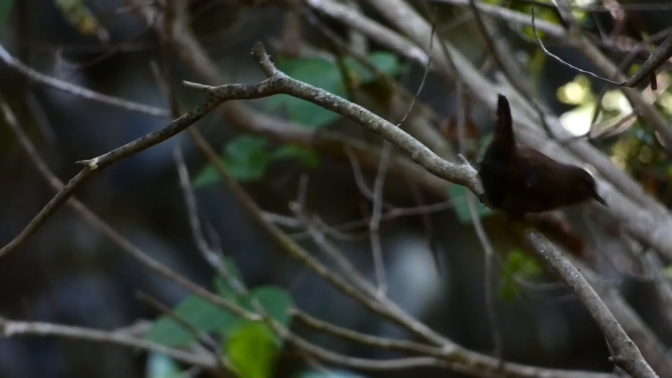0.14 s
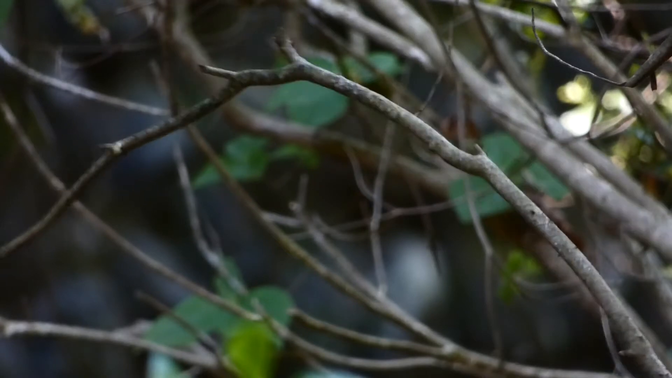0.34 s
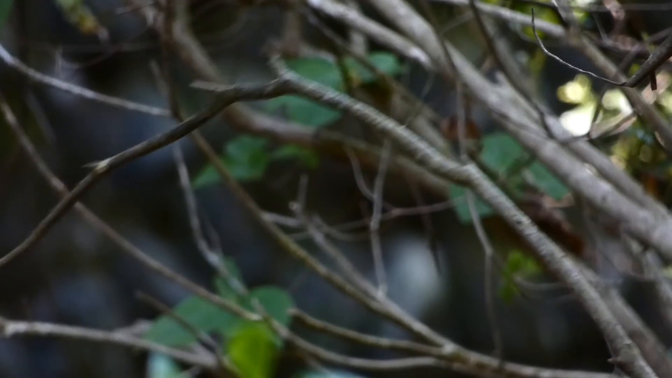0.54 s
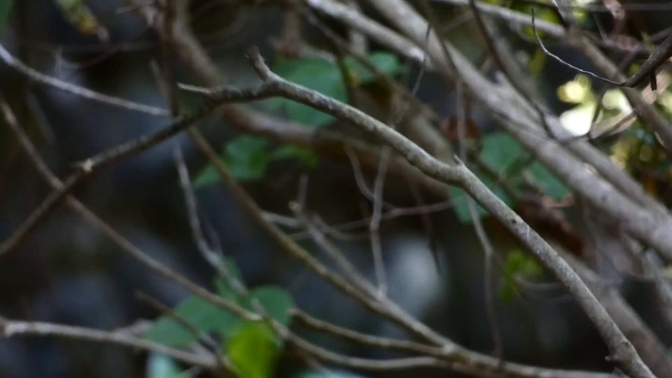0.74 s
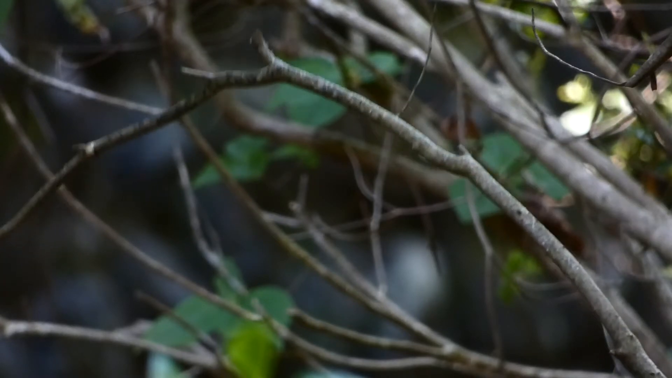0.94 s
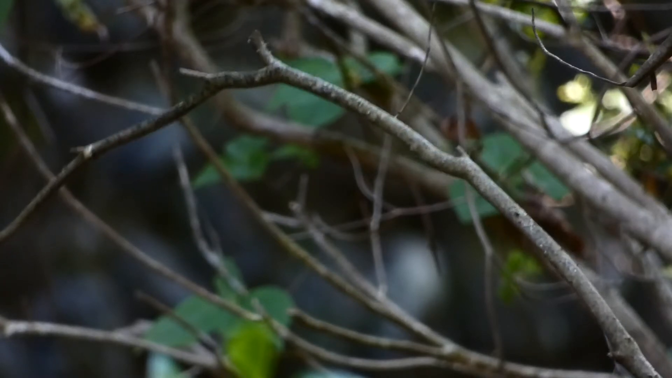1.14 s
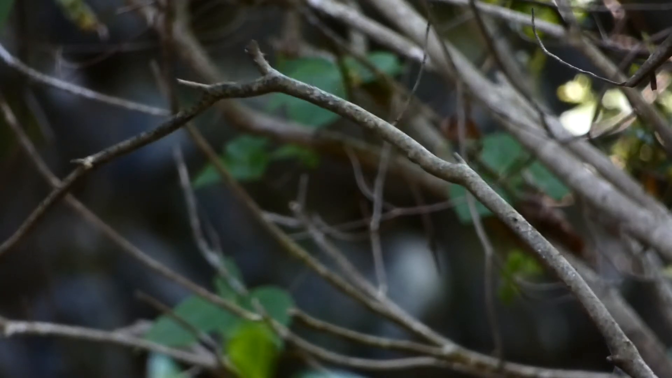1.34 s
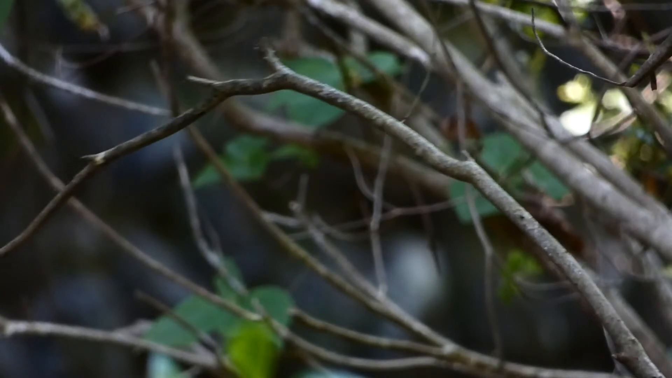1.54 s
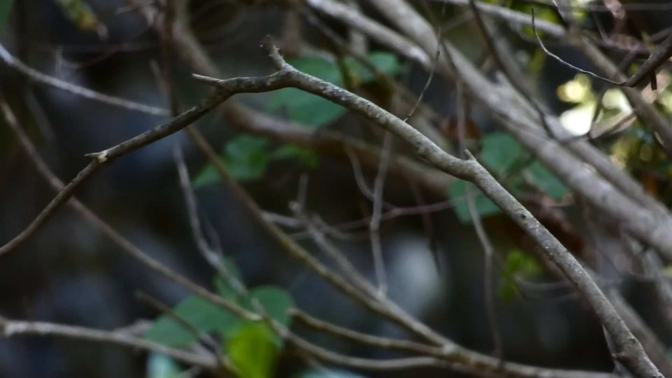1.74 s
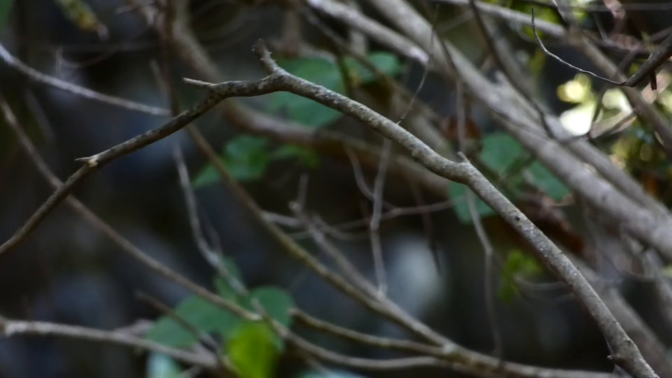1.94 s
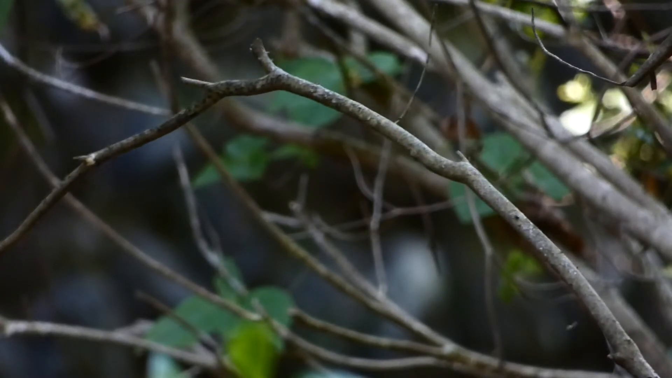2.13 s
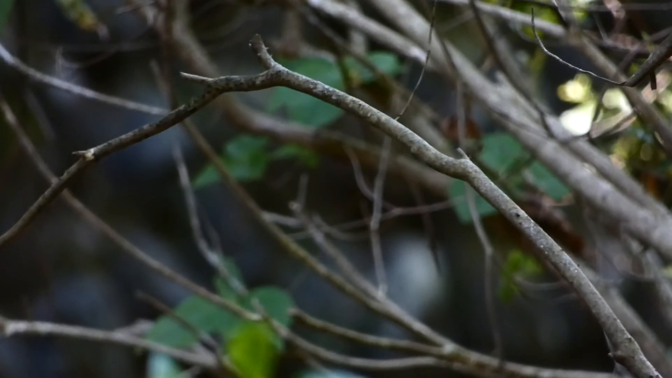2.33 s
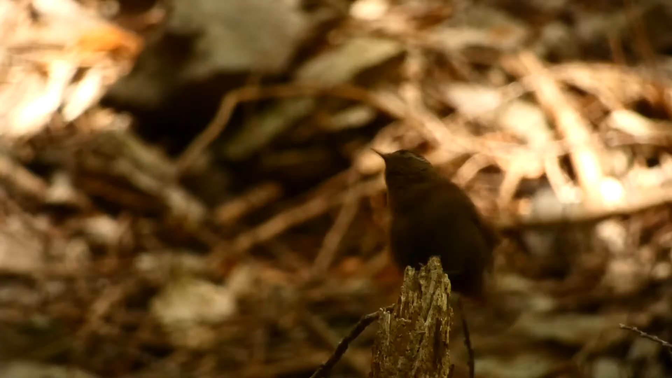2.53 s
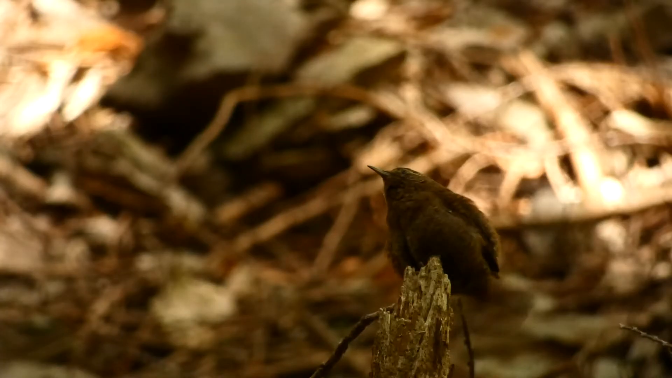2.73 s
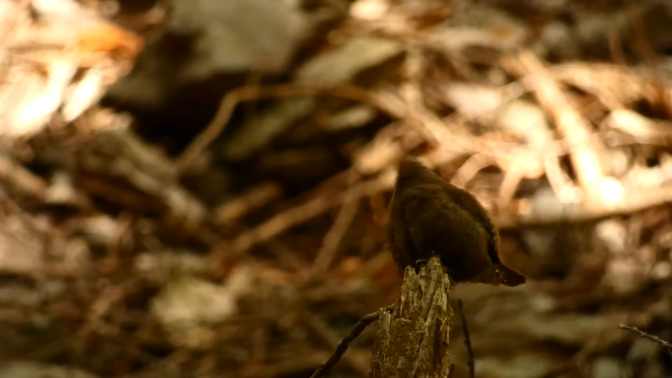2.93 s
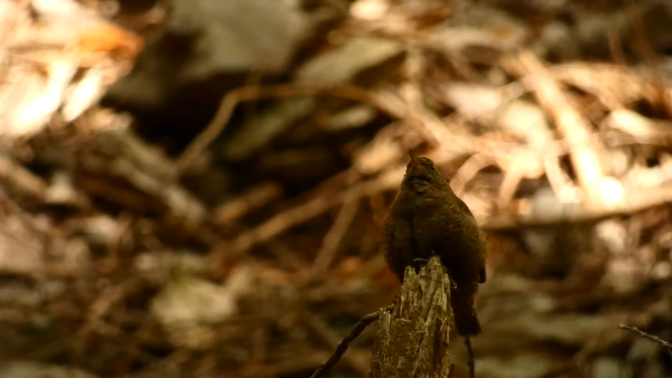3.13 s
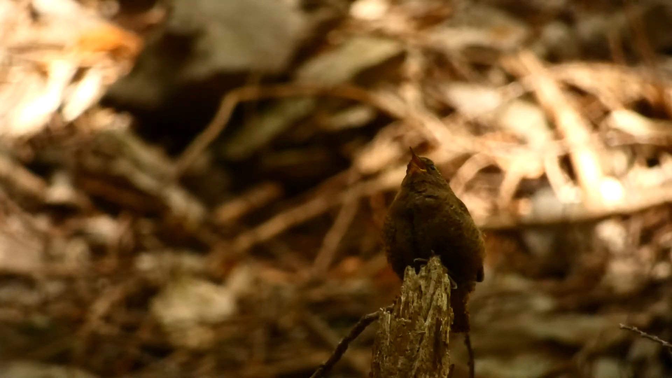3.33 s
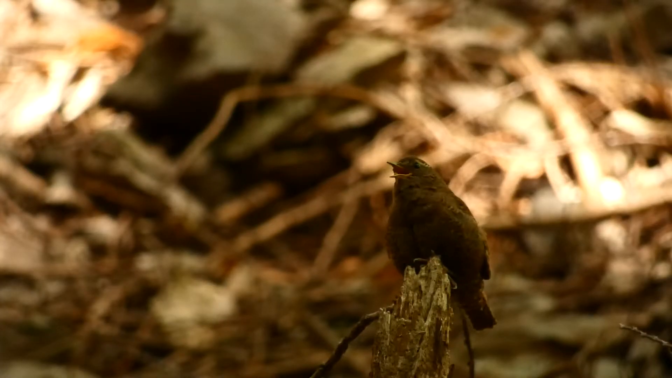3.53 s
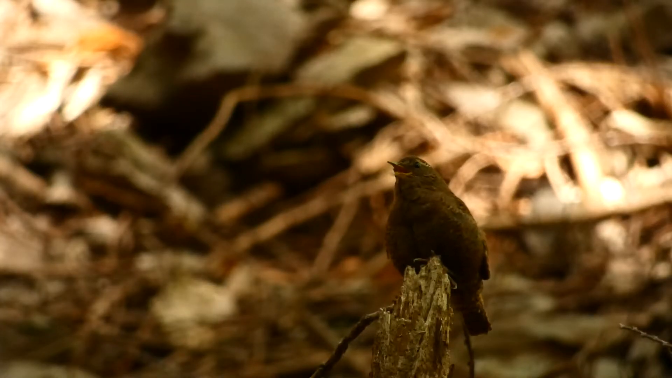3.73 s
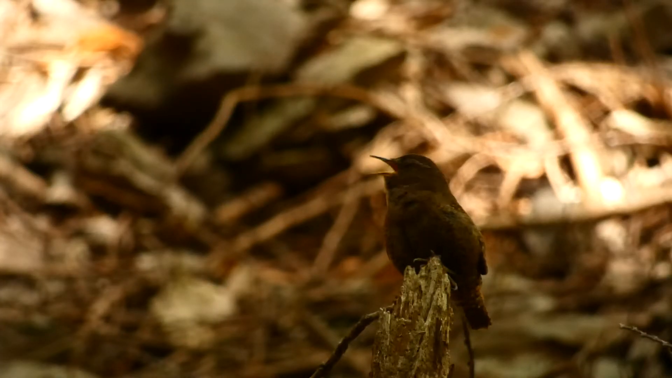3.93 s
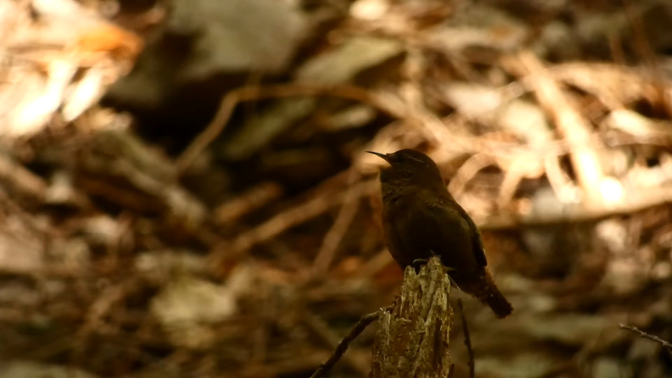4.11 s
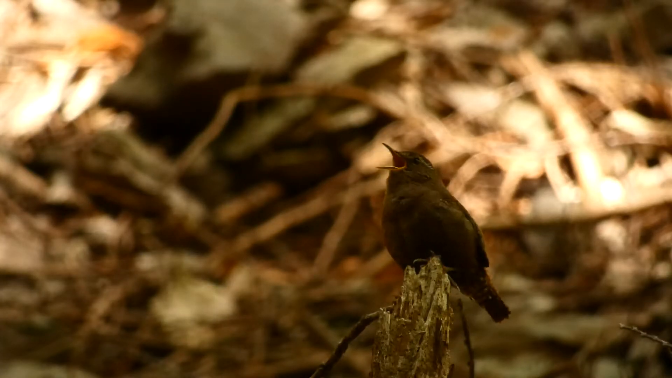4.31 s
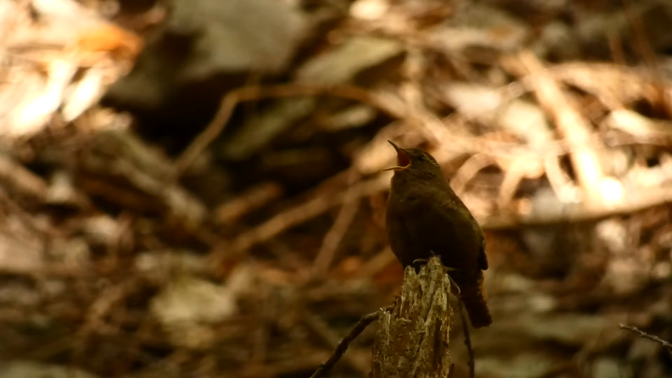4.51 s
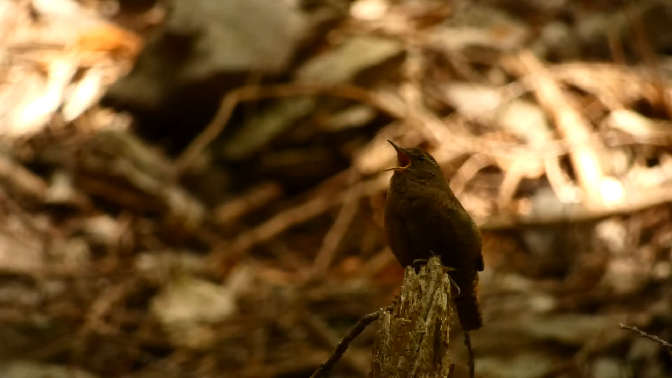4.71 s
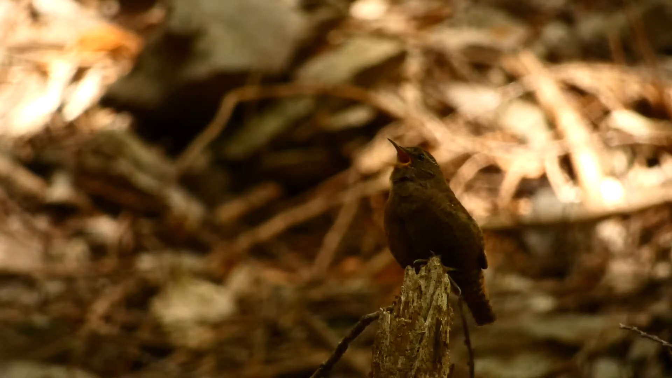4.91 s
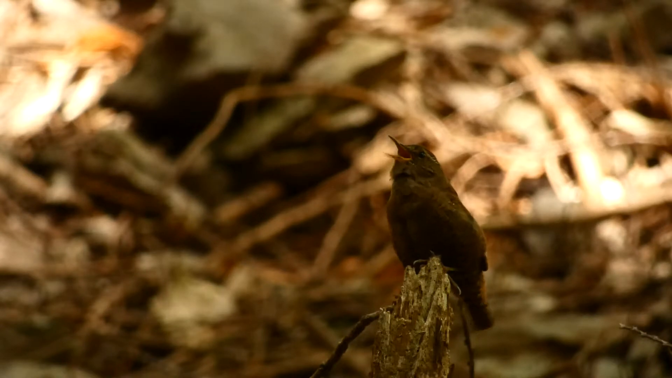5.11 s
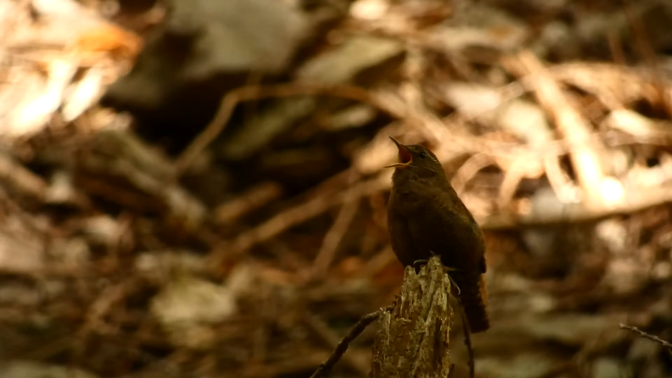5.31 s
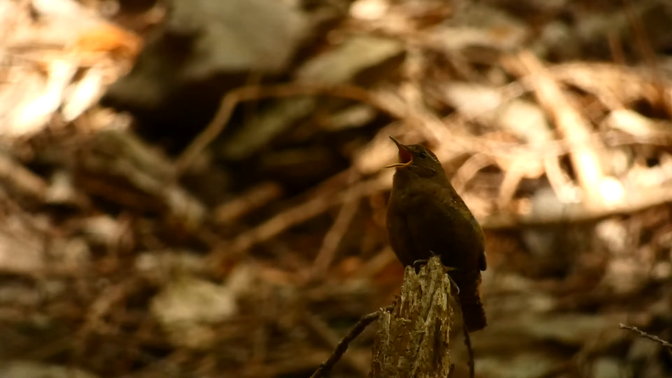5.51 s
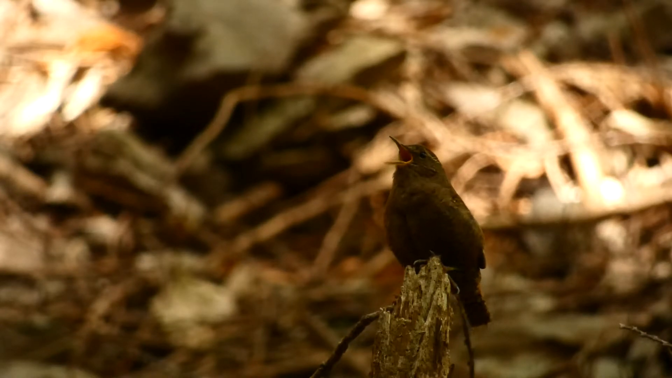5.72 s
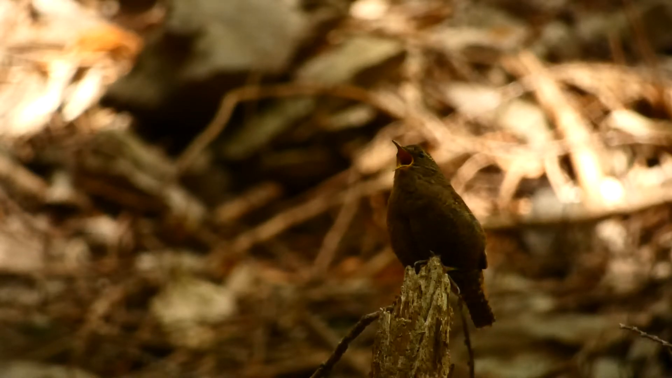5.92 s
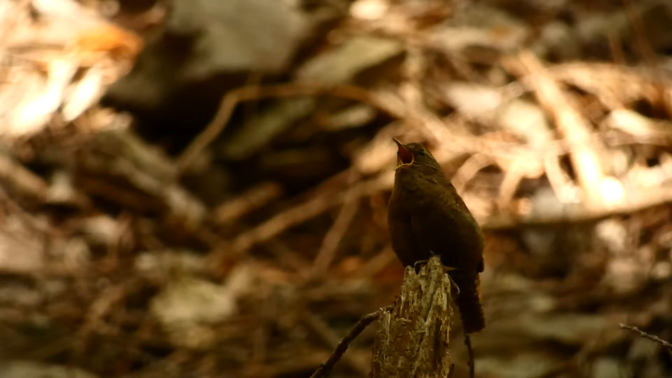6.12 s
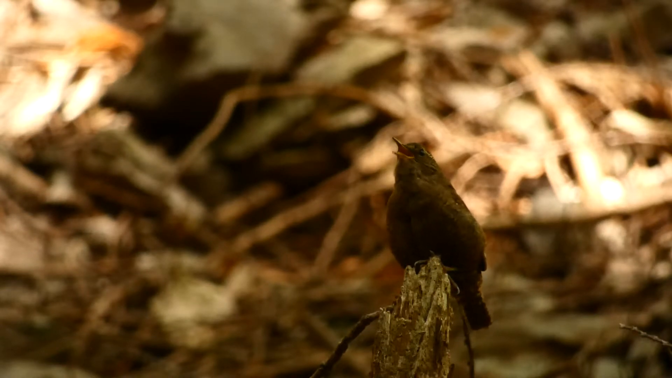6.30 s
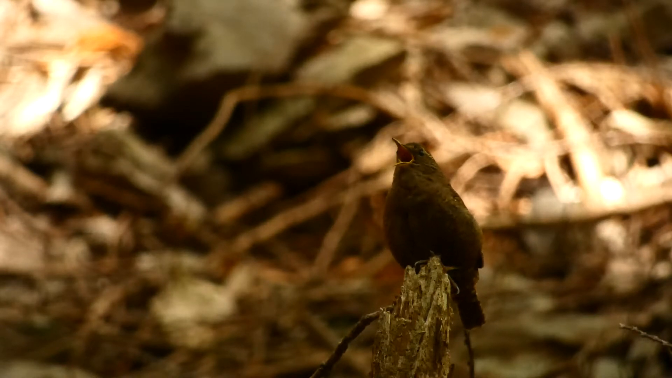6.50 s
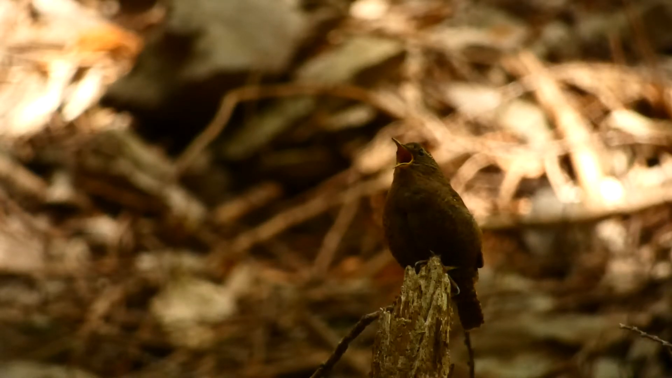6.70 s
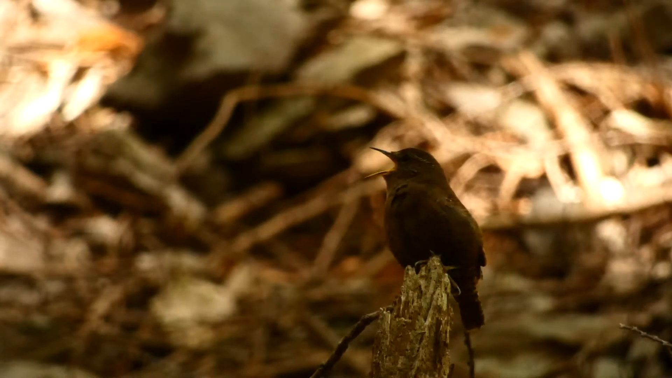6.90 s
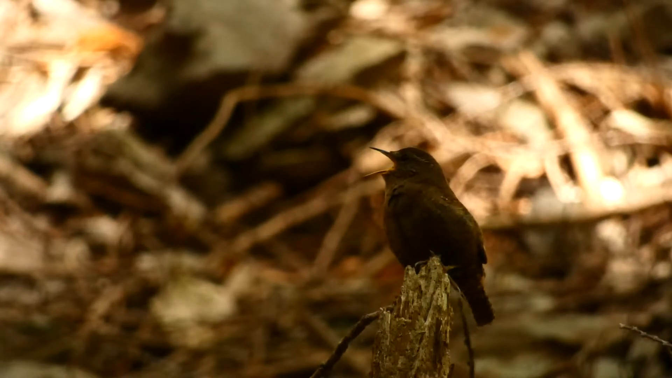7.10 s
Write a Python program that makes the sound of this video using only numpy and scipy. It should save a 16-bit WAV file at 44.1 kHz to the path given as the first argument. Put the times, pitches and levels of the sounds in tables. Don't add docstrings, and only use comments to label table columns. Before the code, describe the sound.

A wren sings far off among croaking frogs in woodland, then after a brief silence sings loud, fast rattles and swooping whistles close by.

```python
import sys
import numpy as np
from scipy import signal
from scipy.fft import rfft, irfft
from scipy.io import wavfile
from scipy.ndimage import uniform_filter1d

SR = 44100
rng = np.random.default_rng(int(sys.argv[2]) if len(sys.argv) > 2 else 0)


def field_ratio(decibels):
    return 10 ** (np.asarray(decibels, dtype=float) / 20)


def bounce(signal):
    frames = np.transpose(np.atleast_2d(signal))
    limited = np.clip(frames, -1, 1)
    pcm = np.round(limited * 32767).astype(np.int16)
    wavfile.write(sys.argv[1], SR, pcm)


N = 315315


def evened(x):
    return x / np.sqrt(np.mean(x ** 2) + 1e-20)


def read(points, hz):
    point_hz, value = np.transpose(points)
    return np.interp(np.log(hz + 1), np.log(point_hz + 1), value)


def add(mix, start_s, sound):
    part = mix[round(start_s * SR):][:len(sound)]
    part += sound[:len(part)]


def narrow_noise(size, centre_hz, width_hz):
    pole = np.exp(-np.pi * width_hz / SR)
    noise = rng.standard_normal(size) + 1j * rng.standard_normal(size)
    slow = signal.lfilter([1 - pole], [1, -pole], noise)
    carrier = np.exp(2j * np.pi * centre_hz * np.arange(size) / SR)
    return evened((slow * carrier).real)


def whistle(pitch_hz, level_db, flutter=0.0):
    pitch_hz = uniform_filter1d(pitch_hz, 150, mode="nearest")
    level_db = uniform_filter1d(level_db, 150, mode="nearest")
    phase = 2 * np.pi * np.cumsum(pitch_hz) / SR
    octave = field_ratio(-50 - 10 * np.maximum(pitch_hz - 4800, 0) / 1000)
    tone = np.sin(phase) + octave * (0.6 + 0.7 * flutter) * np.sin(2 * phase)
    ends = signal.windows.tukey(len(pitch_hz), min(1, 420 / len(pitch_hz)))
    return np.sqrt(2) * field_ratio(level_db) * tone * ends


def song(notes, shimmer_db):
    out = np.zeros(N)
    flutter = evened(uniform_filter1d(rng.standard_normal(N + SR), size=90))
    for curve in notes:
        point_s, pitch_hz, level_db = np.transpose(sorted(curve))
        t = np.arange(point_s[0] - 0.004, point_s[-1] + 0.0015, 1 / SR)
        note_hz, note_db = np.interp(t, point_s, pitch_hz), np.interp(t, point_s, level_db)
        add(out, t[0], whistle(note_hz, note_db, flutter[(t * SR).astype(int)]))
    shimmer = evened(uniform_filter1d(flutter[::-1], size=350))[:N]
    return out * field_ratio(shimmer_db * shimmer)


# bend (>0 glides early, then settles), attack_share, release_share, start_db, end_db
HELD = (1.28, 0.99, 0.73, -7.5, -5.5)
SETTLING = (2, 0.38, 0.5, -6.5, -8.5)
FLICK = (1.25, .5, 0.4472, -11.5, -15)
SWELL = (2.5, 0.5, 0.02, -14.5, -12)


def glides(rows, kind):
    bend, attack_share, release_share, start_db, end_db = kind
    u = np.linspace(0, 1, num=25)
    way = np.expm1(-bend * u) / np.expm1(-bend)
    attack_db = start_db * np.clip(1 - u / attack_share, 0, 1)
    release_db = end_db * np.clip(1 - (1 - u) / release_share, 0, 1)
    notes = []
    for start_s, length_s, first_hz, last_hz, level_db in rows:
        pitch_hz = first_hz + (last_hz - first_hz) * way
        notes.append(list(zip(start_s + length_s * u, pitch_hz, level_db + attack_db + release_db)))
    return notes


def series(repeats, *parts):
    notes = []
    for start_s, effort_db, pitch_factor, length_factor in repeats:
        for part in parts:
            notes.append([(start_s + after_s * length_factor, hz * pitch_factor, db + effort_db)
                          for after_s, hz, db in part])
    return notes


def wood(x, quick_t60_s, slow_t60_s, slow_db, rise_s, same, tilt_db=0.0):
    t = np.arange(round(1.2 * SR)) / SR
    decay = field_ratio(-60 * t / quick_t60_s) + field_ratio(slow_db - 60 * t / slow_t60_s)
    common, left, right = rng.standard_normal((3, len(t)))
    clumps = evened(uniform_filter1d(common[::-1], round(0.006 * SR)))
    decay = decay * field_ratio(2.2 * clumps)
    same = np.clip(same, 0, 1)
    haze = same * common + np.sqrt(1 - same ** 2) * np.array([left, right])
    tail = haze * decay * (1 - np.exp(-t / rise_s))
    octaves = np.log2(np.clip(np.fft.rfftfreq(len(t), 1 / SR), 3000, 9000) / 5000)
    tail = irfft(rfft(tail / np.linalg.norm(tail[0])) * field_ratio(tilt_db * octaves), len(t))
    return signal.fftconvolve(x[None], tail, axes=1)[:, :N]


# freq_hz, left_right_likeness
LIKENESS = [(60, -0.074), (160, -0.061), (420, 0.067), (1110, 0.043), (2930, 0.3), (7740, 0.18),
            (11000, -0.0067)]


def wash(colour, level_db, patchy_db):
    frames, hz = N // 256 + 5, np.fft.rfftfreq(1024, 1 / SR)
    a, b, c, d, patches = rng.standard_normal((frames, 513, 5)).T
    patches = evened(uniform_filter1d(uniform_filter1d(patches, 10, 0), 14, 1))
    same = np.clip(read(LIKENESS, hz), -1, 1)[:, None]
    left = a + 1j * b
    right = same * left + np.sqrt(1 - same ** 2) * (c + 1j * d)
    spectra = np.array([left, right]) * field_ratio(read(colour, hz)[:, None] + patchy_db * patches)
    return field_ratio(level_db) * evened(signal.istft(spectra, nperseg=1024, noverlap=768)[1][:, :N])


# freq_hz, density_db_per_hz
FAR_WASH = [(15, -73.5), (25, -47.5), (146, -4), (308, -5), (339, -7), (619, -3), (751, -10), (868, -11),
            (1370, -13.5), (5310, -31), (8000, -41.5), (10400, -56), (17600, -120)]
# time_s, level_db
FAR_WASH_SWELL = [(0.0, -68.5), (2.55, -63.5), (2.57, -47.5)]


def far_wash():
    swell_db = np.interp(np.arange(N) / SR, *np.transpose(FAR_WASH_SWELL))
    surge = field_ratio(0.665 * (swell_db - swell_db[0]))
    return wash(FAR_WASH, -56.5, patchy_db=1.5) * field_ratio([[-0.6], [0.6]]) * surge


# freq_hz, density_db_per_hz
AIR = [(4500, -28), (6500, 0), (8000, -4.5), (8450, -13.5), (9200, -7), (10000, -4.5), (13300, -12.5),
       (15000, -19.5), (16000, -27)]


def air_hiss():
    return wash(AIR, -73.5, patchy_db=1.0)


def chorus():
    return field_ratio(-70.5) * narrow_noise(N, centre_hz=4750, width_hz=750)


# start_s, level_db
FROG_PULSES = [(0.087, -56.5), (0.324, -51), (0.436, -54), (0.534, -54.5), (0.609, -59), (0.733, -50.5),
               (0.942, -53), (1.014, -55), (1.079, -52.5), (1.135, -70.5), (1.228, -68.5), (1.332, -55.5),
               (1.399, -54), (1.532, -49.5), (1.767, -49), (1.87, -53.5), (1.954, -51.5), (2.172, -52.5),
               (2.271, -52.5), (2.425, -63.5)]
# start_s, level_db, throat_hz, length_s
CROAKS = [(0.107, -57, 1712, 0.034), (0.173, -58.5, 1485, 0.036), (0.179, -57.5, 2095, 0.019),
          (0.448, -53.5, 1220, 0.0529), (0.562, -69, 1277, 0.073), (0.705, -65, 1719, 0.075),
          (0.783, -50.5, 1246, 0.0282), (0.813, -60.5, 772.2, 0.062), (1.125, -56, 1240, 0.09),
          (1.164, -60, 764, 0.0855), (1.675, -58, 1281, 0.024), (1.832, -56, 1476, 0.0302),
          (2.133, -53, 1341, 0.0285), (2.449, -60.5, 1645, 0.049), (2.494, -58, 1432, 0.085)]


def frogs():
    out = np.zeros(N)
    t = np.arange(round(0.0278 * SR)) / SR
    for start_s, level_db in FROG_PULSES:
        pitch_hz = 615 + 18 * rng.uniform(-1.17, 1)
        add(out, start_s, field_ratio(level_db + 1.5) * np.sin(2 * np.pi * pitch_hz * t) * np.hanning(len(t)))
    for start_s, level_db, throat_hz, length_s in CROAKS:
        t = np.arange(round(length_s * SR)) / SR
        throb = 1.0 + 0.38 * np.cos(2 * np.pi * 45 * t)
        throat = narrow_noise(SR // 4, throat_hz, width_hz=60)[:len(t)]
        add(out, start_s, field_ratio(level_db) * throat * throb * signal.windows.tukey(len(t), 0.6))
    return signal.lfilter(*signal.butter(2, 4000, fs=SR), out)


# start_s, length_s, first_hz, last_hz, level_db
NEIGHBOUR = [(1.527, 0.102, 4023, 4102, -56), (.33, .05, 4770, 4543, -66.5), (.63, .05, 4750, 4540, -66.5),
             (1.791, .07, 4074, 4070, -55.5), (1.951, 0.049, 4083, 4084, -60),
             (2.529, 0.0647, 4670, 4773, -52.5), (2.623, 0.0214, 5240, 5740, -61),
             (2.729, 0.0196, 5256, 5760, -60.5), (6.91, .09, 4790, 4740, -56.5),
             (2.827, 0.051, 4946, 4696, -52), (3.183, 0.046, 4899, 4767, -55.5),
             (3.521, 0.0607, 4911, 4723, -54.5)]


def neighbour():
    out = np.zeros(N)
    for start_s, length_s, first_hz, last_hz, level_db in NEIGHBOUR:
        u = np.linspace(0, 1, round(length_s * SR))
        add(out, start_s, whistle(first_hz + (last_hz - first_hz) * u, level_db - 30 * (u - 0.5) ** 2))
    return out


# start_s, length_s, first_hz, last_hz, level_db
FAR_HELD = [(.575, 0.03, 3900, 3800, -58), (.595, 0.06, 3700, 3730, -49), (.768, 0.0296, 5853, 5694, -54.5),
            (.478, 0.075, 5487, 5280, -57), (.83, 0.057, 5255, 5271, -39.5),
            (1.62, 0.068, 4066, 4080, -36.5), (1.695, 0.0494, 4980, 5103, -35)]
FAR_SETTLING = [(.432, 0.035, 6113, 5796, -60.5), (.69, 0.04, 6905, 7775, -64),
                (.772, 0.02, 5750, 5100, -58), (1.118, 0.05, 8200, 8050, -59),
                (1.155, 0.09, 7800, 7580, -54), (1.868, 0.0444, 6193, 4750, -38)]
FAR_FLICKS = [
    (1.29, 0.051, 8250, 7572, -47.5),
    (1.782, 0.026, 6140, 6740, -39.5),
    (1.846, 0.031, 5600, 6087, -43),
    (1.928, 0.023, 5300, 6274, -40),
]
FAR_SWELLS = [
    (.935, 0.12, 6530, 6270, -43),
]
# time_s, pitch_hz, level_db
FAR_FLOURISH = [(1.411, 6270, -40), (1.458, 6290, -41.5), (1.471, 6102, -37), (1.501, 4755, -40),
                (1.53, 4443, -61)]
# after_start_s, pitch_hz, level_db
TRILL_FALL = [(0, 6144, -42.5), (0.015, 5230, -40), (.04, 4620, -34), (.062, 4410, -46)]
TRILL_RISE = [(.082, 5114, -53.5), (0.091, 5697, -38.5), (.102, 6100, -67.5)]
# start_s, effort_db, pitch_factor, length_factor
TRILL = [(1.966, -0.86, 1.0026, 1.046), (2.088, -1.42, 0.993, 0.955), (2.212, -2, 0.9977, 1.007),
         (2.333, -2, 1.001, .99), (2.457, -1.99, 0.993, 1.054)]


def far_song():
    loose = glides(FAR_HELD, HELD) + glides(FAR_SETTLING, SETTLING)
    loose += glides(FAR_FLICKS, FLICK) + glides(FAR_SWELLS, SWELL) + [FAR_FLOURISH]
    return song(loose + series(TRILL, TRILL_FALL, TRILL_RISE), shimmer_db=1.8)


# freq_hz, density_db_per_hz
NEAR_WASH = [(15, -55.5), (25, -20), (100, -19.5), (146, -2), (716, -1), (1370, -8), (1470, -14.5),
             (2120, -11), (3120, -20), (4820, -18.5), (6760, -26.5), (8000, -48), (10400, -81),
             (17600, -120)]


def near_wash():
    return wash(NEAR_WASH, -58, patchy_db=1.5) * field_ratio([[-0.6], [0.6]])


# pitch_hz, width_hz, wavering_db, steady_db
HUM = [(153.26, 4.5, -71.5, -74), (301.7, 9.4, -74.5, -78)]


def hum():
    out = np.zeros(N)
    for pitch_hz, width_hz, waver_db, steady_db in HUM:
        drift = evened(uniform_filter1d(rng.standard_normal(N), 9000))
        line = np.sqrt(2) * np.sin(2 * np.pi * np.cumsum(pitch_hz * (1 + 0.014 * drift)) / SR)
        out += field_ratio(waver_db) * narrow_noise(N, pitch_hz, width_hz) + field_ratio(steady_db) * line
    return out


# start_s, length_s, level_db
DOVE = [(2.642, 0.1315, -57.5), (2.789, 0.189, -63), (3.525, 0.115, -60), (3.663, 0.17, -60.5),
        (4.659, 0.093, -60.5), (4.796, 0.141, -60), (4.978, 0.109, -61), (5.682, 0.072, -60),
        (5.826, 0.14, -61), (6.6, 0.089, -61), (6.744, 0.13, -59), (6.959, 0.076, -61.5)]


def dove():
    out = np.zeros(N)
    for start_s, length_s, level_db in DOVE:
        t = np.arange(round(length_s * SR)) / SR
        hoot = np.sin(2 * np.pi * 368.4 * t) * signal.windows.tukey(len(t), 0.6)
        add(out, start_s, field_ratio(level_db + 1.5) * hoot)
    return out


# time_s, pitch_hz, level_db
SCOOPS = [
    [(2.98, 5027, -68), (2.99, 5580, -65.5), (2.997, 5700, -70)],
    [(3.003, 5445, -60), (3.012, 5572, -56.5), (3.035, 5546, -51.5), (3.047, 5656, -54.5)],
    [(3.084, 7040, -67), (3.095, 6720, -64), (3.107, 6930, -60), (3.118, 7290, -68.5)],
    [(5.848, 7480, -55.5), (5.854, 7187, -43.5), (5.861, 7096, -36), (5.868, 7277, -38.5),
     (5.875, 7530, -46)],
    [(6.071, 4800, -46.5), (6.074, 5450, -37), (6.078, 5800, -31.5), (6.082, 6000, -42)],
]
# time_s, pitch_hz, level_db
PHRASES = [
    [(3.378, 6600, -66), (3.387, 6925, -66.5), (3.40, 6638, -46), (3.47, 6473, -34.5), (3.525, 6386, -37),
     (3.532, 6190, -55.5)],
    [(3.672, 4792, -59), (3.684, 4990, -41.5), (3.698, 5002, -33.5), (3.724, 4782, -32), (3.76, 4700, -35),
     (3.769, 4570, -42.5)],
    [(3.836, 4853, -52), (3.841, 5237, -44), (3.848, 4500, -36), (3.857, 3902, -42.5), (3.866, 3704, -48),
     (3.876, 3653, -51.5)],
    [(3.921, 5420, -56.5), (3.932, 5287, -39.5), (3.96, 5487, -31), (3.99, 5578, -32)],
    [(6.357, 3787, -55), (6.366, 4057, -30), (6.374, 3904, -31), (6.383, 3693, -48)],
    [(6.544, 7043, -60), (6.57, 7930, -44.5), (6.588, 8450, -52.5), (6.616, 8230, -42),
     (6.646, 7992, -38.5)],
    [(6.672, 5550, -51.5), (6.678, 6072, -39), (6.685, 6169, -31), (6.692, 5660, -30.5), (6.701, 5175, -33)],
    [(6.727, 6410, -46), (6.738, 6564, -34), (6.762, 6473, -26), (6.784, 6496, -27.5), (6.797, 6760, -37)],
    [(6.853, 6980, -52), (6.87, 7300, -41.5), (6.895, 7684, -38), (6.94, 7464, -38), (6.988, 7416, -37.5)],
    [(7.04, 7245, -49.5), (7.055, 7583, -43.5), (7.075, 7819, -44), (7.1, 7751, -42), (7.17, 7500, -33.5)],
]
# time_s, pitch_hz, level_db
FLOURISHES = [
    [(3.584, 8570, -70), (3.61, 7810, -46.5), (3.631, 8390, -58.5)],
    [(4.974, 4732, -43.5), (4.985, 4634, -29.5), (5.01, 4533, -26), (5.028, 4368, -23),
     (5.038, 4165, -28.5), (5.046, 3920, -45)],
    [(5.645, 7248, -44.5), (5.678, 7837, -40), (5.74, 7886, -43.5), (5.79, 7731, -41), (5.805, 7700, -50)],
    [(5.919, 6320, -45.5), (5.926, 6136, -38.5), (5.943, 6386, -28.5), (5.993, 6433, -24.5),
     (6.012, 6321, -28.5), (6.027, 6064, -29), (6.041, 5660, -31.5)],
    [(6.112, 6162, -34.5), (6.119, 5506, -27), (6.127, 4970, -24), (6.145, 4647, -26.5), (6.164, 4475, -27),
     (6.172, 4352, -43.5)],
    [(6.223, 8620, -69), (6.233, 7647, -43.5), (6.255, 6378, -34.5), (6.275, 5488, -29),
     (6.29, 5183, -25.5), (6.312, 5045, -23.5), (6.327, 4910, -34.5)],
    [(6.405, 3724, -39), (6.419, 3775, -31.5), (6.43, 3583, -37.5), (6.479, 3402, -35)],
]
# start_s, length_s, first_hz, last_hz, level_db
NEAR_SETTLING = [
    (3.148, .032, 4890, 3893, -52),
]
NEAR_FLICKS = [
    (3.226, 0.046, 4007, 4492, -39.5),
    (3.298, .023, 5670, 3978, -37),
    (3.772, 0.016, 4630, 5080, -58.5),
    (3.801, 0.02, 4690, 4870, -38),
]
# after_start_s, pitch_hz, level_db
RATTLE_FALL = [(.002, 4312, -51.5), (.006, 4200, -42), (.011, 3970, -37.5), (0.0137, 3750, -41),
               (0.016, 3412, -54)]
RATTLE_RISE = [(0.0222, 4290, -44), (.026, 4715, -33), (0.03, 5077, -30), (.034, 5380, -32.5),
               (0.0385, 5622, -44.5)]
CASCADE_FLICK = [(0, 6300, -56.5), (.009, 6643, -39.5), (0.017, 7300, -54)]
CASCADE_DROP = [(0.022, 7505, -58.5), (.027, 7100, -39.5), (.045, 6980, -33), (0.072, 6780, -33.5),
                (0.079, 6615, -29), (.09, 6200, -28), (.102, 5686, -29), (0.107, 5170, -46)]
SWOOP_RISE = [(0, 4610, -34.5), (0.016, 4652, -26), (.028, 5038, -23.5), (.053, 5870, -27),
              (.067, 6556, -36)]
SWOOP_FALL = [(0.114, 6402, -42.5), (0.121, 5881, -34), (.129, 5398, -27), (.142, 5083, -24.5),
              (0.172, 4501, -25.5), (.195, 4200, -25), (.204, 4011, -31), (0.209, 3834, -50)]
# start_s, effort_db, pitch_factor, length_factor
RATTLE_LOW = [(4.021, 2.5, 1.04, 1.01), (4.085, 1.5, 0.99, 1.2), (4.153, -1, 1.004, .95),
              (4.221, -0.18, 0.995, 1.03), (4.289, 0.18, .99, 1.03), (4.359, 0.6, 1.018, .95),
              (4.428, 0.7, 0.986, .97)]
RATTLE = [(4.025, .6, 1.03, .95), (4.089, 0.5, 0.989, 1.01), (4.157, -0.54, 1.0016, .99),
          (4.224, -1.5, 1.001, 1.01), (4.293, 0.45, .995, 1.03), (4.363, 1, 1.012, 0.998),
          (4.431, 2.5, 1.008, 1.005)]
CASCADE_LEAD = [(4.503, 0, 1.023, 1.01), (4.652, 5, 1.005, .95), (4.808, 5, 1.005, .95)]
CASCADE = [(4.508, 0.19, 1.003, 1.034), (4.66, -0.195, 1.0087, 1.031), (4.817, 0.026, 0.9997, 1.029)]
SWOOP = [(5.105, -0.087, 0.9897, 1.001), (5.373, 0.086, 0.9887, .99)]


def near_song():
    loose = glides(NEAR_SETTLING, SETTLING) + glides(NEAR_FLICKS, FLICK)
    loose += SCOOPS + PHRASES + FLOURISHES
    rattle = series(RATTLE_LOW, RATTLE_FALL) + series(RATTLE, RATTLE_RISE)
    cascade = series(CASCADE_LEAD, CASCADE_FLICK) + series(CASCADE, CASCADE_DROP)
    swoops = series(SWOOP, SWOOP_RISE, SWOOP_FALL)
    return song(loose + rattle + cascade + swoops, shimmer_db=0.94)


# start_s, length_s, first_hz, last_hz, level_db
CROW = [
    (5.946, 0.085, 349.6, 331.2, -59),
    (5.99, .06, 400.2, 321.8, -55.5),
    (6.481, 0.072, 321.4, 343.7, -52.5),
    (6.534, 0.065, 340, 312, -51.5),
]
# freq_hz, gain_db
CROW_THROAT = [(300, -23), (660, -9), (1000, -1.5), (1350, -9), (1700, -46.5), (2100, -10), (2600, -34.5)]


def crow():
    out = np.zeros(N)
    for start_s, length_s, first_hz, last_hz, level_db in CROW:
        pitch_hz = np.linspace(first_hz, last_hz, round(length_s * SR))
        hoarse = uniform_filter1d(rng.standard_normal(SR // 4), 150)[:len(pitch_hz)]
        pitch_hz = pitch_hz * (1 + 0.42 * hoarse)
        phase = 2 * np.pi * np.cumsum(pitch_hz) / SR
        stack = sum(field_ratio(read(CROW_THROAT, k * pitch_hz)) * np.cos(k * phase) for k in range(1, 9))
        add(out, start_s, field_ratio(level_db) * evened(stack) * signal.windows.tukey(len(pitch_hz), 0.5))
    return out


def change_view(first, second):
    t = np.arange(N) / SR
    fade_s, silence_s, return_s = 2.549, 2.577, 2.6185
    fade = np.interp(t, (fade_s - 0.012, fade_s, silence_s), (1, 0.65, 0.12)) * (t < silence_s)
    whisper = field_ratio(-30 - 700 * abs(t - silence_s)) * (t >= silence_s)
    return first * (fade + whisper) + second * np.clip((t - return_s) / 0.00111, 0, 1)


def scene():
    far, near, croak, low = far_song(), near_song(), frogs(), dove() + crow()
    birds, air = neighbour() + chorus(), air_hiss()
    distant = field_ratio(-8.0) * birds + wood(birds, 0.33, 0.9, -28.5, 0.01, 0.763)

    far_haze = field_ratio(0.75) * wood(far, 0.243, 0.82, -7.0, 0.00059, 0.8735)
    first = far_wash() + air + distant
    first += (field_ratio(-13) * far + far_haze) * field_ratio([[0.5], [-0.6]])
    first += croak * field_ratio([[-2.5], [1.5]]) + field_ratio(-4.0) * wood(croak, 0.984, 0.54, -33, 0.0058, 0.9)

    near_haze = field_ratio(-3) * wood(near, 0.4734, 1.062, -13.0, 0.00056, 0.87, tilt_db=-4.0)
    second = near_wash() + air + hum() + distant
    second += (field_ratio(3.5) * near + near_haze) * field_ratio([[-0.3], [0.3]])
    for side, echo_db in zip(second, (-15.5, -14.5)):
        add(side, 0.029, field_ratio(echo_db) * near)
    second += field_ratio(-1.0) * low + field_ratio(-6) * wood(low, 0.25, 0.8, -22.0, 0.019, 0.71)
    return change_view(first, second)


def masked(x):
    margin_db, up_db, down_db, whim_db = 26.5, 7, 17, 6.0
    z = signal.stft(x, nperseg=2048, noverlap=1536)[2]
    bands = z[:, :1024].reshape(2, 64, 16, -1)
    level_db = 10 * np.log10((abs(bands) ** 2).sum(axis=(0, 2)) + 1e-16)
    khz = np.arange(64) * 16 * SR / 2048e3
    apart = (khz[:, None] - khz) * (5.6 / (khz + 0.4)) ** 1.3
    spread_db = margin_db + np.where(apart > 0, up_db * apart, -down_db * apart)
    masker_db = -45 + 0.72 * (level_db + 45)
    hidden_db = 10 * np.log10(field_ratio(-2 * spread_db) @ field_ratio(2 * masker_db))
    faint_db = np.median(level_db, axis=1) - np.where(khz > 7.2, 5, 40)
    hidden_db = np.maximum(hidden_db, faint_db[:, None])
    whim = evened(uniform_filter1d(rng.standard_normal(level_db.shape), size=4))
    keep = np.clip((level_db - hidden_db + whim_db * whim) / 2, 0.01, 1)
    z[:, :1024] *= np.repeat(keep, 16, axis=0)
    return signal.istft(z, nperseg=2048, noverlap=1536)[1][:, :N]


def low_pass(x):
    return signal.sosfilt(signal.butter(12, 15700, fs=SR, output="sos"), x)


def record(dry):
    mix = masked(dry)
    return low_pass(mix)


dry = scene()
out = record(dry)
bounce(out)
```